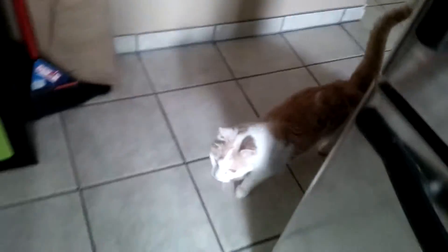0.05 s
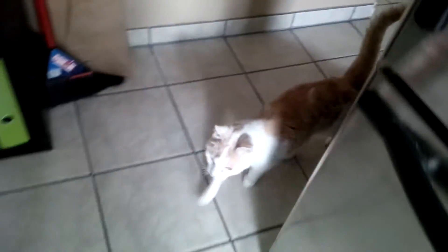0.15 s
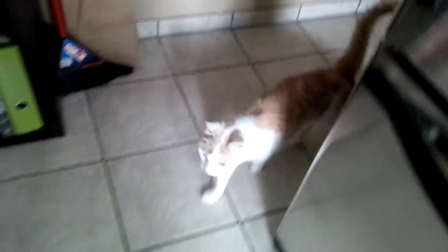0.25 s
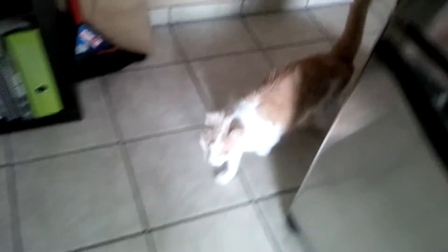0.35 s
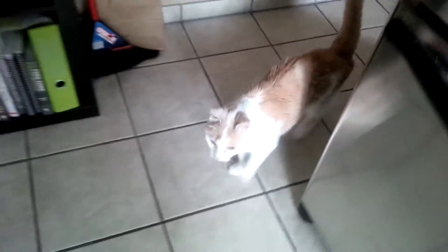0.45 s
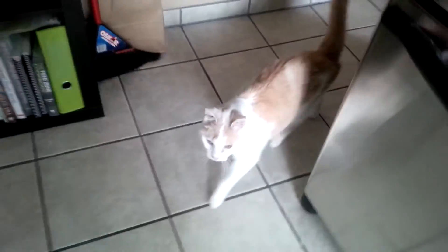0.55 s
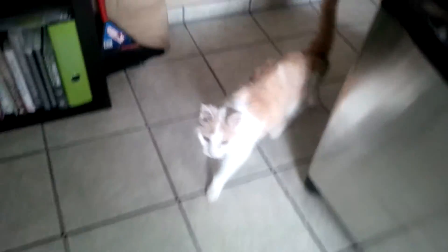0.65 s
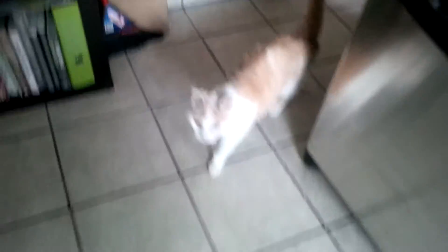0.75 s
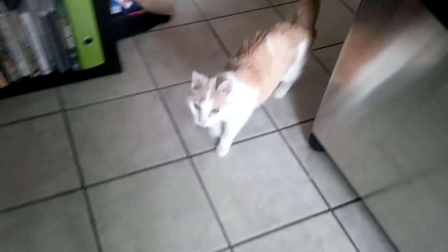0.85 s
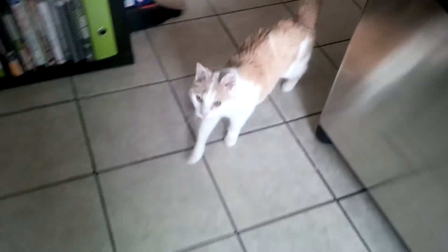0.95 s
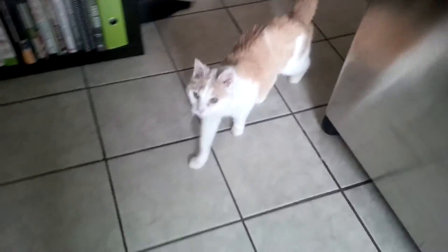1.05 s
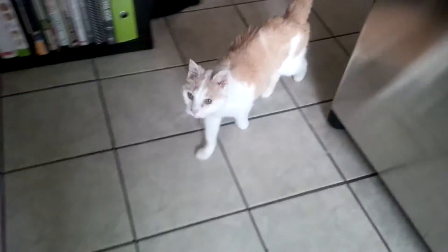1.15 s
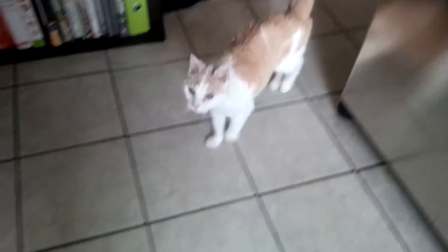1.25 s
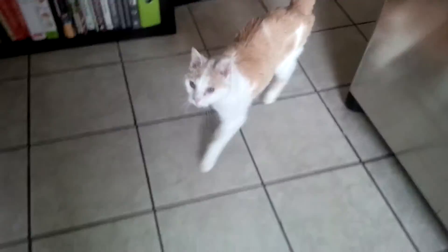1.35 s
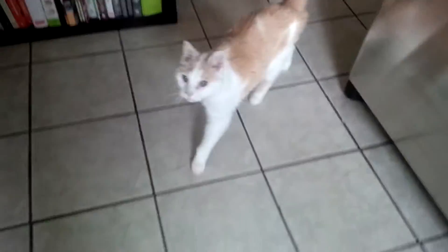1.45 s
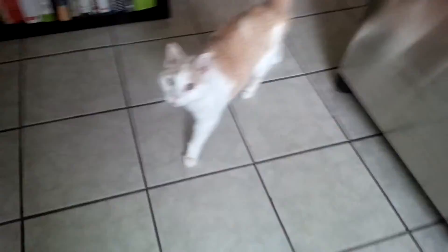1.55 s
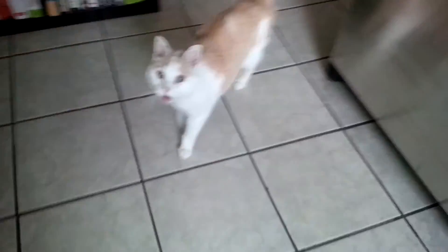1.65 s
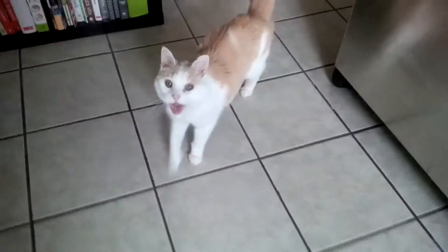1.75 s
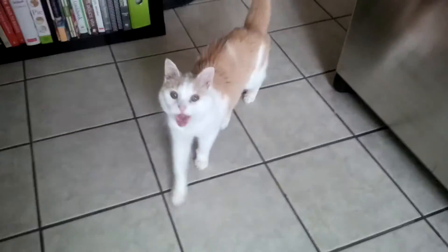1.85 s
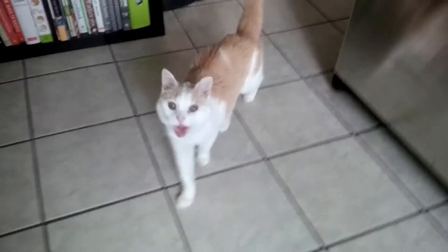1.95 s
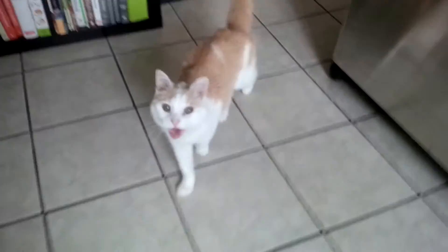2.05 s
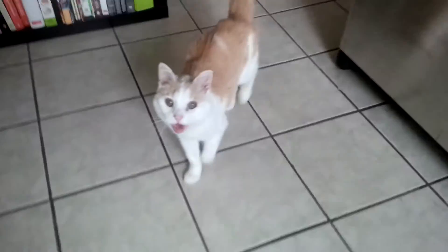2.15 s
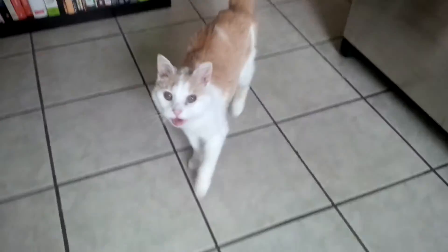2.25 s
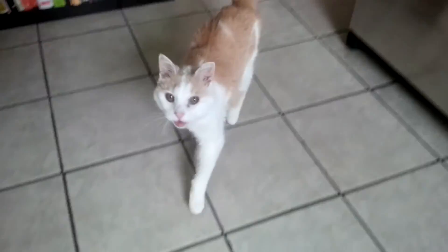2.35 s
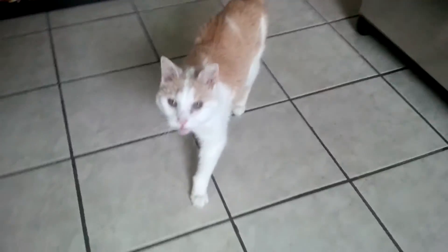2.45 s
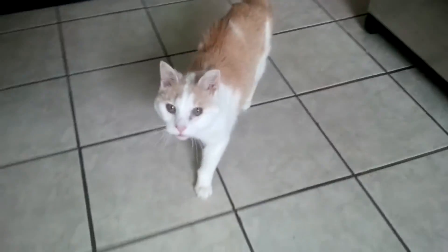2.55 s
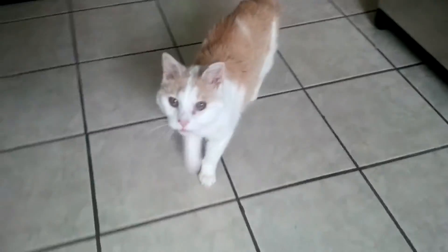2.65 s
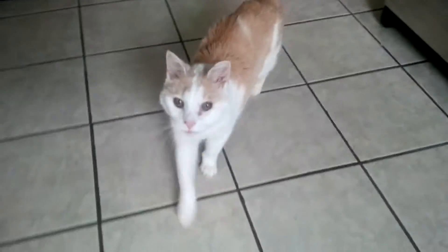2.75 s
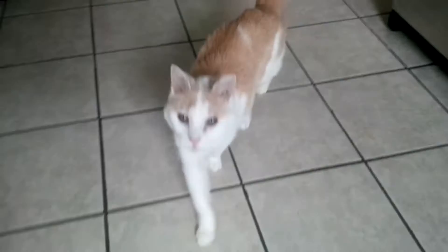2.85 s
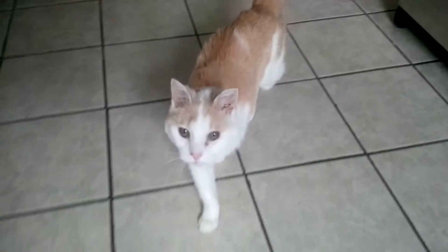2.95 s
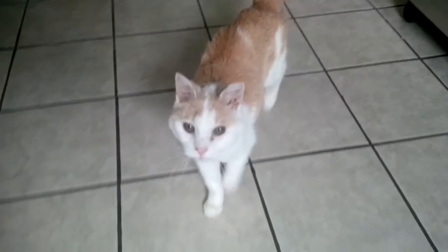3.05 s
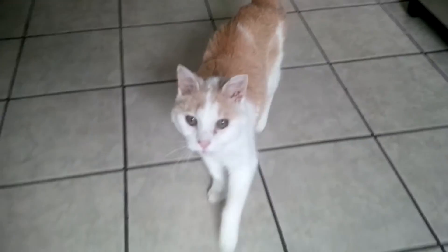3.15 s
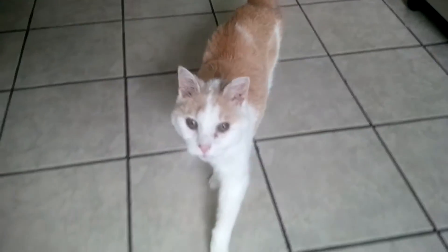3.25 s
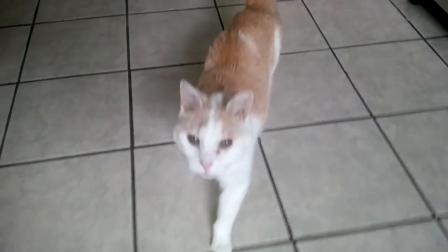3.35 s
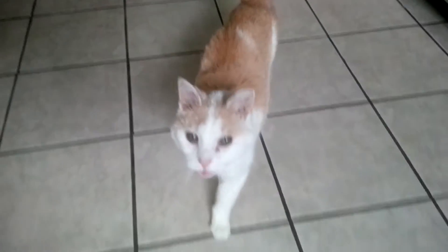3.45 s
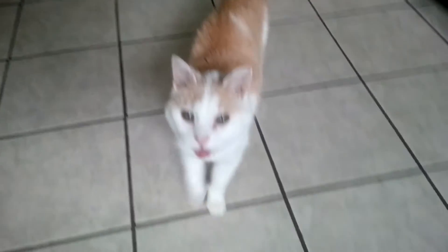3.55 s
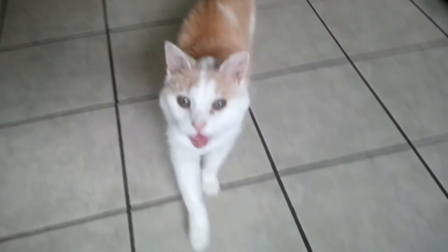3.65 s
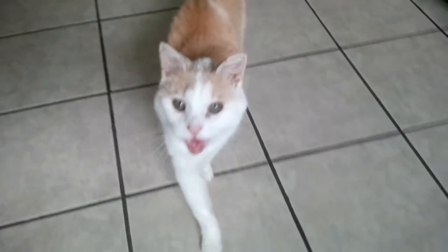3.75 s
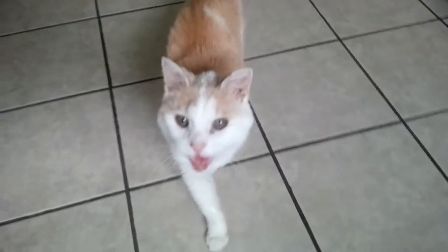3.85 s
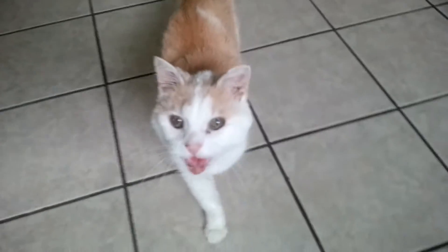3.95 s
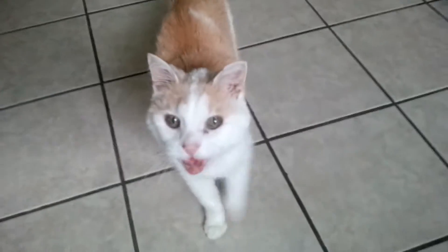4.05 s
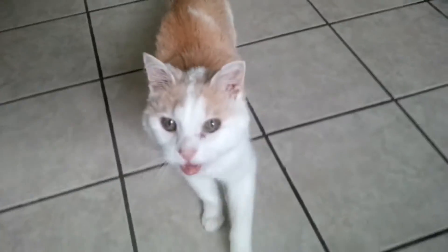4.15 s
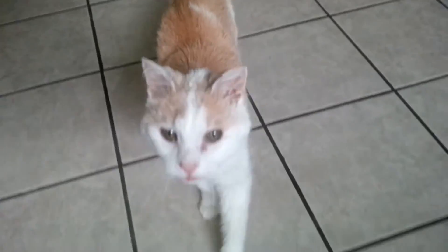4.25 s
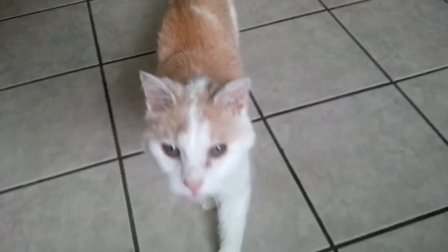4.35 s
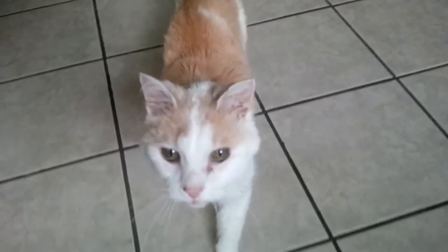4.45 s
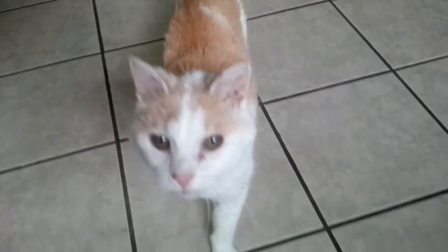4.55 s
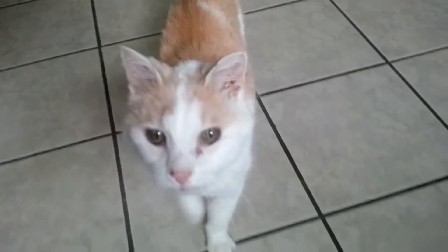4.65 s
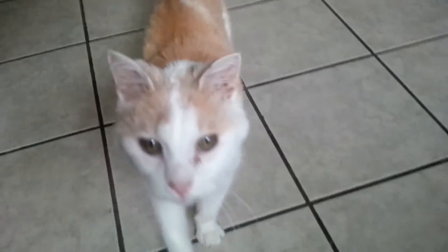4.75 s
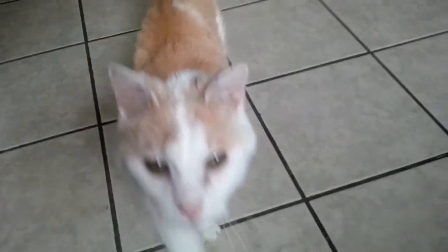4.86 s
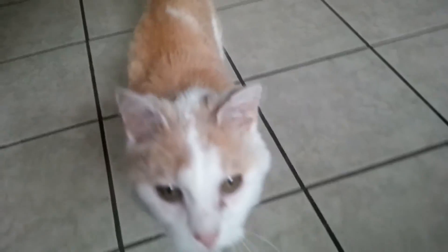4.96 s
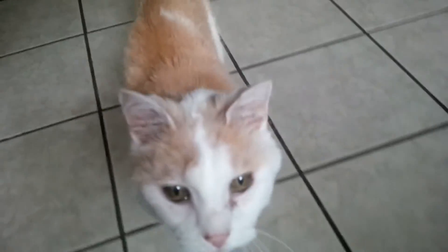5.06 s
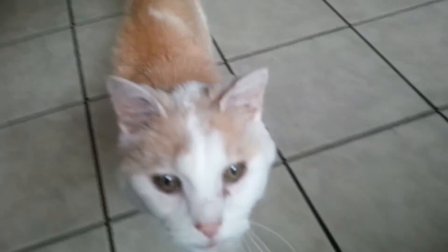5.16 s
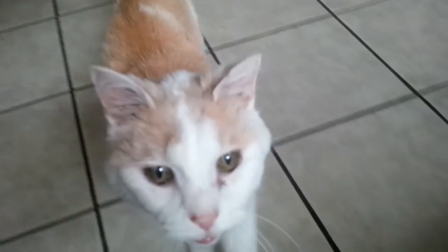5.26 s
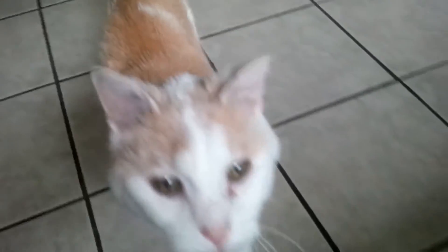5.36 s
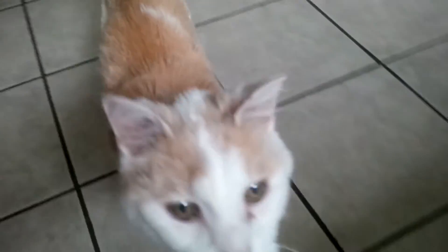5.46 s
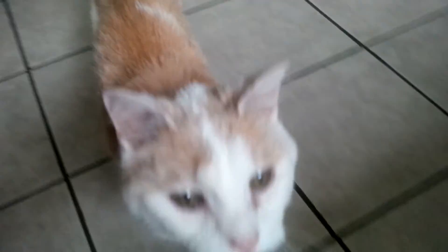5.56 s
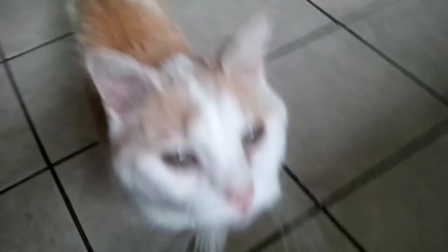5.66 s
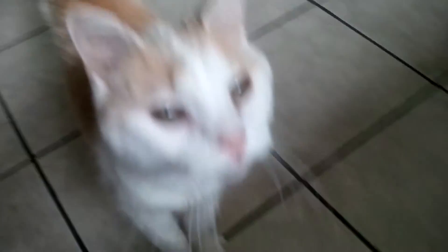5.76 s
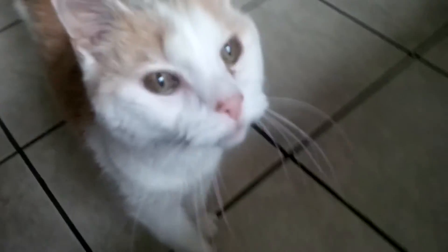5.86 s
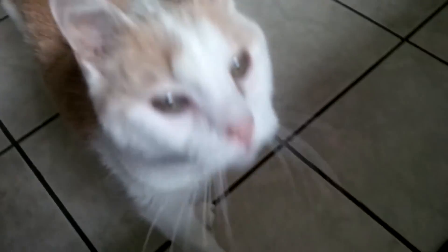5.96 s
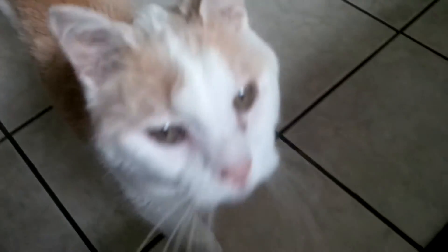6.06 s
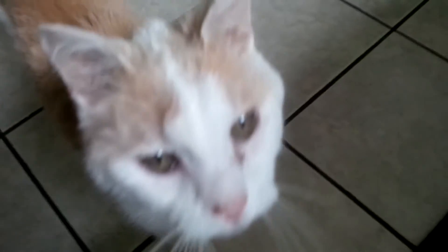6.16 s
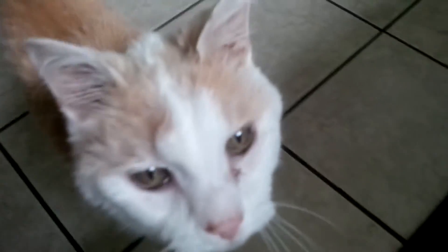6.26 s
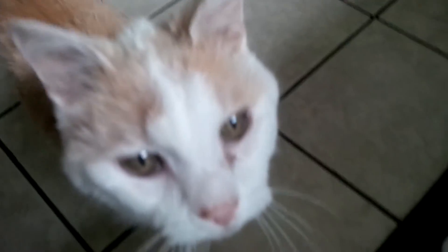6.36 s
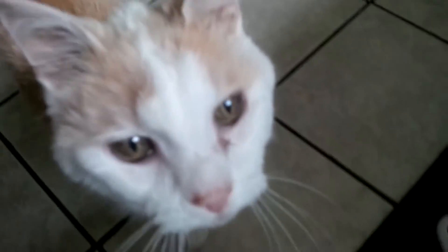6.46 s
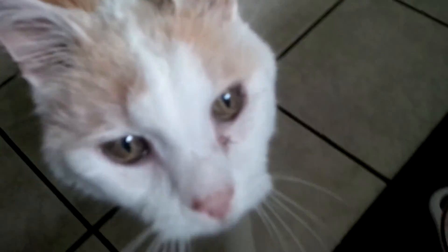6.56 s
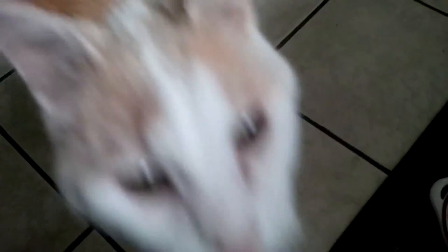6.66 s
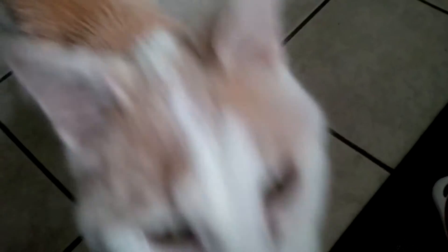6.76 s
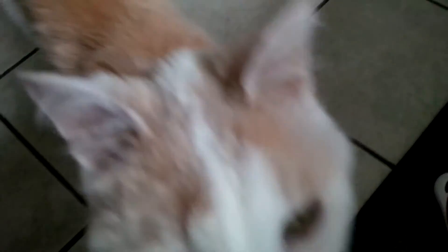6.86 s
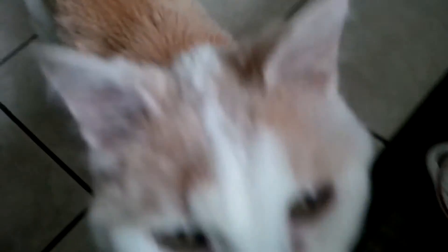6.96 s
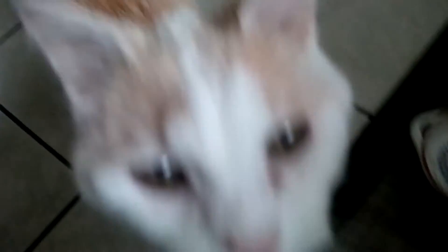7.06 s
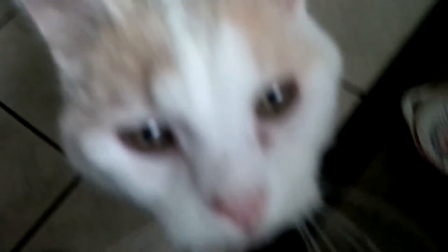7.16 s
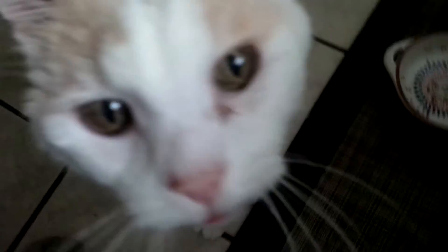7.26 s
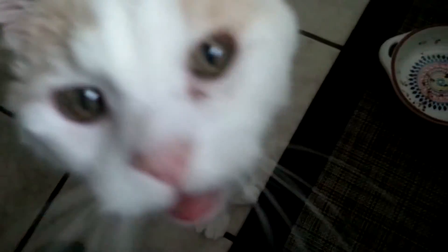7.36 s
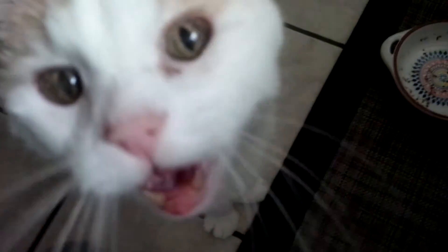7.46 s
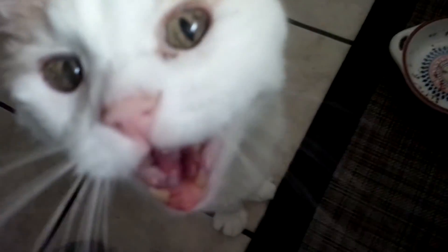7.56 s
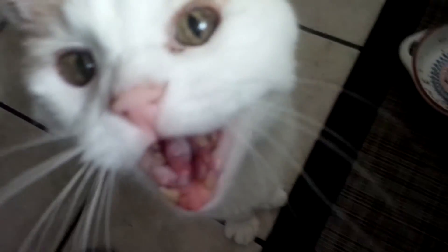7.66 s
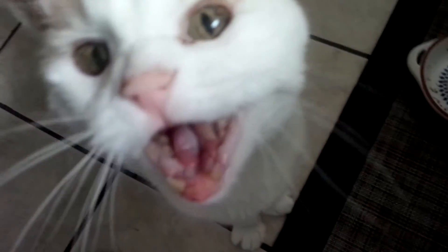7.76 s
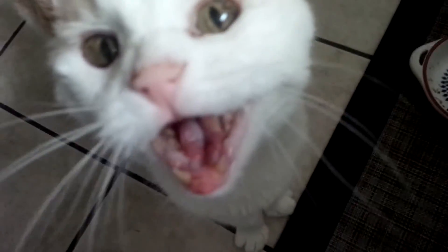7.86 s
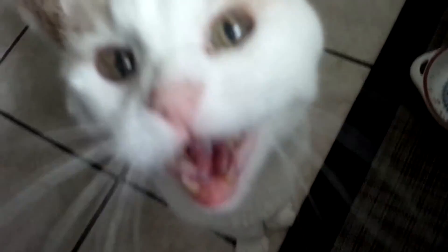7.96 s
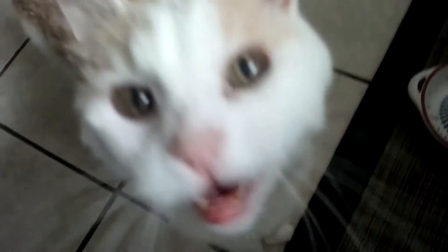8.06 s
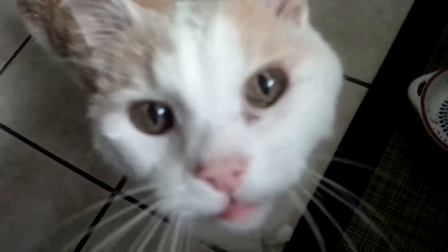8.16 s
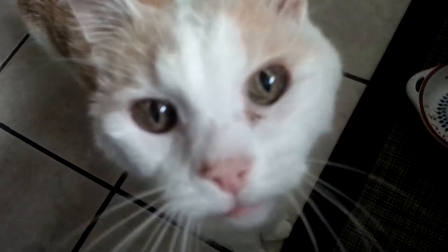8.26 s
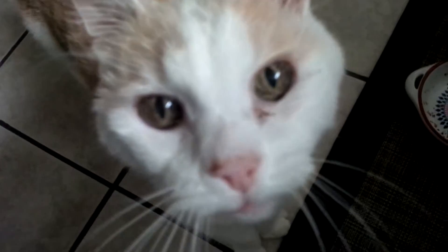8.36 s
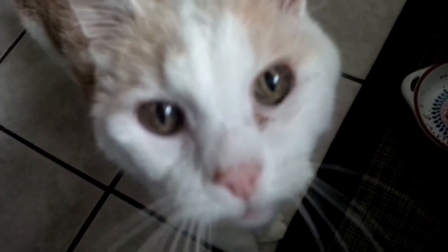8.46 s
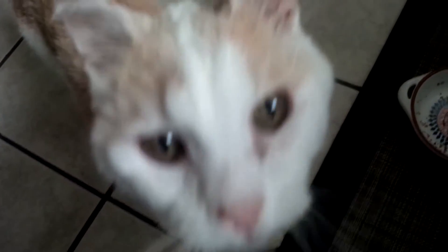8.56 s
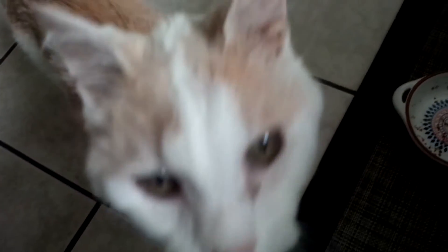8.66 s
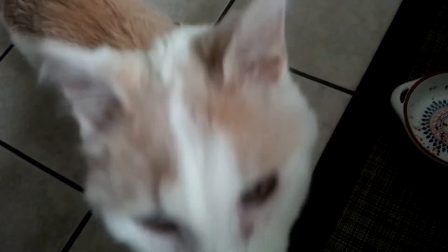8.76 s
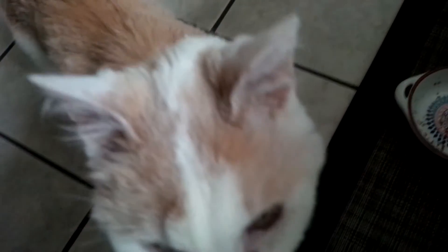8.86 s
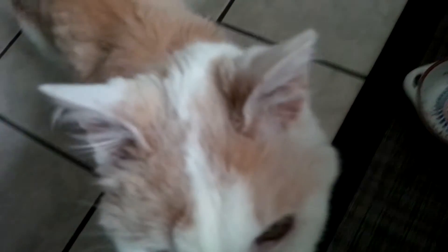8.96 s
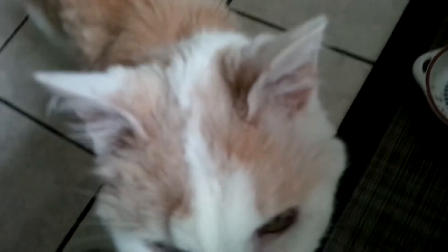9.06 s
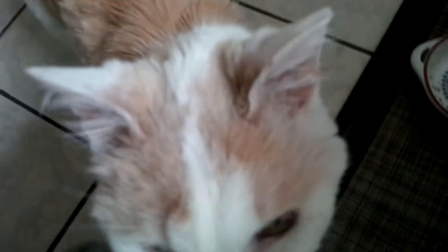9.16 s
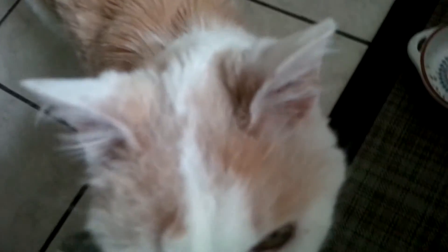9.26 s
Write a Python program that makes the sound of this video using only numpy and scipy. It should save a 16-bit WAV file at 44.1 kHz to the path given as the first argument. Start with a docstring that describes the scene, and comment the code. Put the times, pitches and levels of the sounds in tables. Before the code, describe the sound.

In a tiled room something creaks and rattles in slow slips, then an old cat gives five hoarse, purring meows, drawing closer, amid handling ticks.

```python
"""A tiled room, close on a hand-held camera with two microphone ports, the left one facing away.
First something creaks in slow slips, each crack and rattle answered by the tiles, over an uneven low rumble and room tone.
From 1.4 s an old cat meows five times: voice harmonics through a throat and an opening mouth, a purr shaking each start.
The tiles answer less over the first four calls as the cat walks up. Fingers tick on the camera body as damped pushes;
short puffs of shaped noise hiss past from 2.8 s on."""
import sys
import numpy as np
from scipy import signal
from scipy.fft import rfft, irfft, next_fast_len
from scipy.io import wavfile
from scipy.ndimage import map_coordinates

SR = 44100
rng = np.random.default_rng(int(sys.argv[2]) if len(sys.argv) > 2 else 0)


def master(y):
    """Save y as 16-bit WAV."""
    cut = np.clip(np.atleast_2d(y).T, -1, 1)
    pcm = np.round(cut * 32767)  # scale
    wavfile.write(sys.argv[1], SR, pcm.astype(np.int16))


N = 411012

# room tone colour: freq_hz, level_db (relative, per Hz)
AIR_COLOUR = [(15, -16), (30, -2.5), (60, -4.5), (100, -3.5), (150, -19), (205, -7), (260, -13),
              (350, -17.5), (800, -20.5), (1200, -23.5), (2000, -27.5), (4500, -35.5), (6500, -40.5),
              (11000, -43), (12500, -50), (13200, -70.5)]
AIR_DB = -62.5  # before the waver
# low rumble through the scene, before its lumps: time_s, level_db
RUMBLE_LEVEL = [(0, -69.5), (.65, -58.5), (2.1, -69), (3.35, -69.5), (5.11, -64), (5.76, -72.5),
                (7.11, -61), (7.4, -64.5), (9.32, -77.5)]
# rumble colour: freq_hz, level_db (relative, per Hz)
RUMBLE_COLOUR = [(15, -13), (28, 4.5), (70, -8), (140, -5.5), (230, -17.5), (400, -52.5)]
# how much the background agrees at the two ports: freq_hz, likeness (correlation)
PORT_LIKENESS = [(30, .8), (300, .75), (2000, .65), (8000, .55)]
# the left port faces away: freq_hz, left_minus_right_db
PORT_SHADE = [(60, -1), (320, -4), (740, -6), (1130, -9), (1700, -13), (2600, -9), (5000, -8), (9000, -3.5)]
# decay of the tiled room: freq_hz, t60_s
TILE_DECAY = [(150, 0.51), (1500, 0.37), (4000, 0.45), (10000, 0.028)]
TOP_HZ = 14800  # band limit of the camera

# short puffs of hiss, before their grain: height_s, rise_s, fall_s, low_band_db, high_band_db, colour_hz, colour_db
PUFFS = [(2.844, 0.052, 0.078, -57, -62, 4500, -60.5), (3.12, 0.11, 0.15, -67, -89, 2500, -76),
         (4.224, 0.027, 0.026, -49.5, -74, 5600, -55), (4.76, 0.25, 0.3, -61, -91, 1426, -68.5),
         (5.658, 0.083, 0.035, -58.5, -101, 1860, -63), (6.35, 0.022, 0.045, -75, -96.5, 1730, -75.5),
         (6.999, 0.022, 0.051, -71.5, -99, 1800, -65.5), (8.11, 0.057, 0.13, -52, -68.5, 2600, -49),
         (8.148, 0.025, 0.048, -49, -58, 11120, -57.5)]
# colour of a puff's low band: freq_hz, level_db (relative, per Hz)
PUFF_LOW_COLOUR = [(150, -13), (400, 17.5), (1500, 7), (2800, 4), (3600, -3.5), (4600, -1), (5800, -16),
                   (6500, -5.5), (9000, -49.5)]
# colour of a puff's high band: freq_hz, level_db (relative, per Hz)
PUFF_HIGH_COLOUR = [(6500, -34), (8500, 4), (10000, 0), (12500, -6), (14500, -55)]
PUFF_SPAN_DB = 30  # covered by one rise or fall
PUFF_Q, PUFF_GRAIN_DB = 2.8, 3  # sharpness of each of two stacked resonances; graininess

# fingers on the camera: start_s, thud_db (peak if the contact were instant), snap_db, contact_ms (held to 0.05-2)
TICKS = [(1.554, -32.5, -40, 0.12), (1.692, -18, -55, 0.57), (1.728, -16, -58, 1),
         (1.766, -29, -50.5, 0.42), (1.823, -24.5, -61, 0.4), (1.89, -35, -69, 0.13),
         (2.01, -36, -69, 0.21), (2.134, -23, -47, 0.26), (2.173, -32, -69.5, 0.18),
         (2.337, -23.5, -64.5, 0.28), (2.676, -29, -59, 0.41), (2.815, -8, -72.5, 0.73),
         (2.827, -10, -66.5, 0.96), (2.834, -17.5, -63, 0.8), (2.863, -30, -63, 0.5),
         (3.042, -38, -77, 0.44), (3.516, -25.5, -57, 0.048), (3.653, -35, -57, 0.34),
         (3.752, -31, -81, 0.4), (3.851, -35.5, -56, 0.1), (3.997, -34.5, -60.5, 0.079),
         (4.110, -26.5, -50.5, 0.15), (4.244, -13, -39, 1), (4.401, -29.5, -49, 0.59),
         (5.645, -37, -84.5, 0.26), (6.025, -39, -74.5, 0.36), (8.594, -36.5, -71.5, 0.046),
         (8.9, -42, -59, 0.091)]
# resonances of the camera body: freq_hz, width_hz, level_db
CAMERA_BODY = [(305, 130, 10), (805, 890, 3.5), (1600, 1100, -5)]
SNAP_T60_S = .016

# body colour of the creak: freq_hz, level_db (relative)
CREAK_COLOUR = [(40, -36), (130, -3), (290, -3.5), (500, -11.5), (650, -12), (850, -13.5), (1450, -11.5),
                (1900, -18), (2600, -24.5), (3500, -37), (4700, -46), (6000, -67), (12000, -76)]
# slow strokes of the creak: start_s, length_s, start_db, height_db, end_db, height_at (share of the length)
STROKES = [(0.027, 0.12, -39, -42.5, -56, 0.42), (.228, 0.036, -42.5, -54, -39, 0.93),
           (0.31, 0.24, -57, -35, -51, 0.93), (0.711, 0.18, -49, -37, -40.5, 0.26),
           (0.942, 0.018, -45, -46, -61, 0.45), (1.043, 0.36, -40.5, -35.5, -58.5, 0.23)]
# sharpest slips: start_s, level_db (before the slip parts), treble_db (under that, before SQUEAL_DB is added)
SHARP_SLIPS = [(0.029, -42, -32), (0.056, -39.5, -37), (0.079, -43, -37), (0.103, -42.5, -39),
               (0.138, -41, -39), (0.229, -37, -34), (0.308, -38.5, -34), (0.354, -39.5, -35),
               (0.381, -38, -43), (0.423, -37.5, -35), (0.453, -37.5, -37), (0.475, -39.5, -28),
               (0.518, -39, -34), (0.711, -40.5, -34), (0.724, -40.5, -32), (0.762, -33.5, -37),
               (0.809, -36, -40), (0.866, -34.5, -34), (0.941, -40.5, -38), (1.044, -32, -30),
               (1.1, -32.5, -35), (1.135, -32.5, -27), (1.29, -46, -36), (1.323, -47, -36)]
# squeal resonances: freq_hz, width_hz, level_db (relative)
SQUEAL_COLOUR = [(3500, 1500, -3), (4650, 630, 3)]
SQUEAL_DB = 3.5  # added to the treble of a sharp slip
RUB_DB, RUB_GROWS, SLIP_MID_DB = -32, 1.7, -42  # treble of a soft slip at the middling level; dB per dB above it
CRACK, CRACK_HISS, RATTLE = 3, .3, .3  # gains of the parts of a slip
RATTLE_T60_S = .045
SLIP_GAP_S, SLIP_UNEVEN, SLIP_SCATTER_DB = 0.012, .5, 4.5  # middling gap, its log spread, level spread

# five meows, a list each: time_s, pitch_hz, hum_db (low hum), cry_db (open cry), mouth_hz (main mouth resonance)
MEOWS = [
    [(1.42, 301, -55.5, -56, 1100), (1.5, 295.3, -46, -59, 1040), (1.62, 292.7, -35.5, -49, 1150),
     (1.665, 319.4, -46.5, -34, 1157), (1.72, 355.3, -32.5, -31, 1470), (1.84, 384.6, -40.5, -34, 1826),
     (1.95, 388.8, -45.5, -22, 1790), (2.03, 393.7, -42.5, -22, 1770), (2.14, 378.9, -29.5, -21.5, 1544),
     (2.34, 370.4, -35, -19, 1413), (2.41, 358.8, -29, -31, 1430), (2.54, 331.5, -57, -56.5, 1510)],
    [(3.25, 281, -65, -50.5, 1080), (3.3, 276.1, -49, -73, 1140), (3.4, 279.1, -39.5, -38, 1160),
     (3.53, 314.2, -31.5, -30, 1290), (3.61, 347.1, -36.5, -36.5, 1480), (3.69, 385.7, -36, -31.5, 1710),
     (3.78, 391, -41.5, -28.5, 1780), (3.88, 387.4, -36, -24.5, 1880), (3.97, 384.8, -34, -21, 1670),
     (4.09, 382.6, -40, -22, 1540), (4.15, 368.4, -27, -24.5, 1365), (4.22, 337.2, -33.5, -42.5, 1500),
     (4.27, 320, -68.5, -53, 1350)],
    [(5.05, 267.3, -56, -59, 990), (5.07, 271.4, -47, -54, 1110), (5.13, 291.1, -40.5, -50, 1120),
     (5.19, 290.6, -34, -39.5, 1280), (5.25, 302.6, -33, -31.5, 1370), (5.33, 306, -31.5, -31, 1456),
     (5.42, 318.6, -34.5, -33.5, 1490), (5.48, 305.5, -34, -39, 1470), (5.56, 288.5, -83, -67, 1470)],
    [(7.107, 289.5, -37, -50, 990), (7.125, 280.1, -47, -47.5, 995), (7.2, 263.9, -38.5, -51.5, 1180),
     (7.36, 280.4, -26.5, -33.5, 1320), (7.48, 307.8, -21.5, -23.5, 1423),
     (7.57, 317.2, -23.5, -23.5, 1504), (7.7, 356.9, -26.5, -22.5, 1644), (7.86, 366.4, -28, -17, 1710),
     (8.01, 369.8, -26.5, -20, 1683), (8.04, 361.5, -26.5, -23.5, 1600), (8.07, 332.3, -25.5, -26, 1460),
     (8.095, 291, -23.5, -26, 1390), (8.14, 278, -51.5, -66, 1320)],
    [(8.94, 328.8, -50, -48, 970), (8.97, 325.3, -51, -41, 970), (9.05, 303, -32, -47.5, 950),
     (9.1, 305.2, -26, -16.5, 960), (9.15, 305.7, -29, -39, 990), (9.2, 316, -30, -29.5, 980),
     (9.26, 342, -36, -19.5, 1205), (9.32, 335.5, -42, -17, 1165)],
]
# one row a meow: purr_rate_per_s, purr_phase_turns, lips_wide_s, purr_stops_s, voice_breaks_s, tears_s,
# chest_db (at middling effort), top_db (under the teeth), room_db
CALLS = [(33.35, 0.55, 1.69, 1.61, 2.36, 2.46, -50.5, -34, -10),
         (30.62, .1, 3.57, 3.58, 4.12, 4.2, -49, -42, -11.5),
         (33.05, 0.14, 5.44, 5.5, 5.2, 5.5, -41.5, -32, -14),
         (31.435, 0.29, 7.45, 7.6, 8.01, 8.075, -37, -19, -20),
         (31.96, 0.033, 9.23, 9.4, 12, 12, -42.5, -36, -12)]
# five lists: time_s, upper_mouth_hz, upper_db, pharynx_db, teeth_hz, teeth_db, shoulder_db (relative to the cry)
UPPER_MOUTH = [
    [(1.42, 2470, -89.5, -85, 5150, -95, -13), (1.634, 2270, -66.5, -82, 5010, -84, -6),
     (1.684, 2560, -48, -68.5, 4620, -57.5, -9), (1.862, 2440, -48.5, -49, 4840, -63, -4.5),
     (2.096, 2510, -37.5, -53.5, 4730, -50, -14.5), (2.286, 2670, -53.5, -60, 4490, -58, -11),
     (2.34, 2520, -31, -63.5, 4650, -57, -13), (2.482, 2030, -57, -81, 4500, -69.5, -4),
     (2.54, 2200, -64.5, -92, 4550, -84.5, -16.5)],
    [(3.25, 2520, -92, -100, 5070, -99, -20.5), (3.426, 2160, -71.5, -83, 4380, -83, -8.5),
     (3.448, 2100, -54.5, -87.5, 4232, -64, -25.5), (3.578, 2390, -46, -62.5, 4780, -59, -3.5),
     (3.798, 2520, -40, -46.5, 4520, -60, -1.5), (3.97, 2346, -44.5, -46, 4670, -50.5, -5.5),
     (4.098, 2460, -38, -51.5, 4310, -53.5, -5), (4.252, 2100, -49.5, -81.5, 5050, -66.5, -13.5),
     (4.27, 2350, -54.5, -71, 5120, -74, -10)],
    [(5.04, 2450, -77, -95.5, 4590, -99, -6.5), (5.06, 2540, -73.5, -85, 4670, -90.5, -8),
     (5.188, 2230, -84.5, -86, 4700, -88.5, -5), (5.248, 2020, -48, -76.5, 4610, -82, -7.5),
     (5.258, 2100, -50.5, -70, 4600, -56.5, -14), (5.306, 2150, -57, -79.5, 4650, -58, -11.5),
     (5.416, 2010, -40.5, -64.5, 4630, -57, -9), (5.512, 2100, -62, -86.5, 4870, -64, -2.5),
     (5.56, 2250, -75, -84, 4620, -90, -9)],
    [(7.1, 2420, -86, -80.5, 4650, -98.5, -4), (7.225, 2340, -79, -62.5, 4370, -80, -2.5),
     (7.328, 2270, -68, -67, 4270, -76, -7), (7.408, 2220, -43, -57, 5070, -59.5, -19),
     (7.502, 2330, -35.5, -50, 4370, -49.5, -2.5), (7.626, 2630, -36, -48.5, 5020, -46.5, -4.5),
     (7.782, 2680, -37, -44.5, 4920, -46.5, -8), (8.0, 2700, -33.5, -42.5, 4890, -43, -8),
     (8.028, 2530, -38, -51.5, 5260, -48, -7.5), (8.14, 2360, -47.5, -63, 4720, -54.5, -15)],
    [(8.94, 2580, -95.5, -99, 4800, -99, -7.5), (8.954, 2530, -82.5, -87.5, 4790, -72.5, -10.5),
     (9.034, 2230, -93.5, -92.5, 4910, -85, -6), (9.066, 2190, -85, -102, 4370, -91, -9),
     (9.102, 2130, -67, -86, 4290, -59, -22), (9.162, 2190, -59, -82, 4060, -65.5, 3),
     (9.252, 2270, -44, -58, 4430, -48, -11.5), (9.304, 2440, -48, -56, 4720, -49.5, -4.5),
     (9.32, 2440, -43, -64, 4650, -47, -21)],
]
# one row a meow: pitch_swing (share of pitch at full purr), purr_dip_db (before scaling by frequency),
# throat_hz, pharynx_hz, slit_db (palate muted by the slit)
TRACTS = [(.09, 6, 570, 3150, 22), (.08, 9, 570, 3350, 22), (.11, 9, 570, 3450, 22), (.09, 8, 690, 3500, 0),
          (.07, 11, 660, 3500, 22)]
# hoarseness while purring, one share a meow
PURR_HOARSENESS = [.28, .22, .2, .11, .07]
# the voice catches: time_s, depth_db, half_width_s
CATCHES = [(1.787, 2, 0.013), (2.101, 0.5, 0.009), (2.153, 4.5, 0.022), (2.309, 7, 0.011),
           (2.384, 9, 0.038), (4.133, 4.5, 0.005), (7.172, 18, 0.011), (7.617, 7, 0.0083),
           (9.046, 13, 0.0078)]
# throat: width_hz, rise_hz at a full gape
THROAT = (356, 117)
# pharynx: width_hz behind a slit, width_hz wide open
PHARYNX = (330, 800)
# nose while the lips are a slit: times the mouth resonance, width_hz, level_db relative to the hum or cry
NASAL = (1.47, 620, -18.5)
# vocal widths are those of a single resonance; its level response is cubed in use
CHEST_HZ, CHEST_WIDTH_HZ, TOP_VOICE_HZ, TOP_VOICE_WIDTH_HZ = 340, 260, 7900, 1400
PALATE_HZ, PALATE_WIDTH_HZ, PALATE_DB = 5900, 900, -8  # level relative to the teeth
TEETH_SLIT_HZ, TEETH_WIDE_HZ, UPPER_WIDTH_HZ = 480, 1350, 500  # widths
HUM_MID_DB, CHEST_GROWS = -40, 0.19  # middling effort; dB per dB of hum
CHEST_GAPE_DB = 4.5  # a full gape thins the chest
WIDE_S, NARROW_DB = .04, 22  # slit to wide lips; a wide mouth mutes the nose
PURR_FIRST, PURR_LAST, PURR_CLEAR, PURR_BROKEN = .95, .52, .05, .4  # purr depth 0-1
PURR_FADE_S, RASP_FADE_S, BREAK_S = .11, .24, .06  # the rasp outlasts the purr
HOARSE_CLEAR = .14  # share of the purring hoarseness
HOARSE_ONSET, HOARSE_END, HOARSE_TORN, ONSET_S, TEAR_S = .12, .25, 1.1, .08, .02
DRIFT_DB = .9  # wander of each harmonic, before its growth with harmonic number


def amp(db):
    """Decibels to gain."""
    return 10 ** (np.asarray(db) / 20)


def unit(x):
    """x at rms 1."""
    return x / np.sqrt(np.mean(np.abs(x) ** 2) + 1e-20)


def along(points, hz):
    """(Hz, value) points read on a log frequency axis."""
    f, v = np.transpose(points)
    return np.interp(np.log(hz + 1), np.log(f + 1), v)


def read(rows, t):
    """Each column after the time, at the moments t."""
    s, *cols = np.transpose(rows)
    return [np.interp(t, s, c) for c in cols]


def filtered(x, response):
    """x times a complex response of frequency."""
    m = next_fast_len(N + SR // 2)
    return irfft(rfft(x, m) * response(np.fft.rfftfreq(m, 1 / SR)), m)[..., :N]


def peak(f, hz, width):
    """One causal resonance of gain 1."""
    return 1j * f * width / (hz * hz - f * f + 1j * f * width)


def modes(table):
    """Response of several resonances of alternate sign."""
    return lambda f: sum((-1) ** k * amp(db) * peak(f, hz, w) for k, (hz, w, db) in enumerate(table))


def causal(spectrum):
    """A response with the given colour that rings only after the blow (minimum phase)."""
    def response(hz):
        cepstrum = irfft(along(spectrum, hz) * np.log(10) / 20)
        n = np.arange(len(cepstrum))
        fold = np.where(n < len(cepstrum) // 2, 2, 0) / np.where(n == 0, 2, 1)
        return np.exp(rfft(cepstrum * fold))
    return response


def noise(spectrum, alike):
    """Stereo noise of rms 1, mid and side mixed to the wanted likeness of the ports."""
    def response(hz):
        turn = np.arccos(np.clip(along(alike, hz), -1, 1)) / 2
        return amp(along(spectrum, hz)) * [np.cos(turn), np.sin(turn)]
    mid, side = filtered(rng.standard_normal((2, N)), response)
    return unit(np.array([mid + side, mid - side]))


def slow(t, rate, count):
    """count smooth random curves with rate knots a second (below 900)."""
    knots = rng.standard_normal((count, int((t[-1] - t[0]) * 900) + 9))
    return np.array([map_coordinates(k, [(t - t[0]) * rate], order=1) for k in knots])


def place(out, s, x):
    """A copy of out with x added from second s."""
    i = round(s * SR)
    x = x[..., :N - i]
    return out + np.pad(x, [(0, 0)] * (x.ndim - 1) + [(i, N - i - x.shape[-1])])


def air():
    """Room tone that wavers a little, and an uneven low rumble, both shaped noise."""
    t = np.arange(N) / SR
    lumps = amp(2.5 * slow(t, 5, count=1))
    waver = amp(1.5 * slow(t, 4, count=1) + slow(t, 14, count=1))
    tone = amp(AIR_DB) * waver * noise(AIR_COLOUR, PORT_LIKENESS)
    return tone + amp(read(RUMBLE_LEVEL, t)[0]) * lumps * noise(RUMBLE_COLOUR, PORT_LIKENESS)


def room(x):
    """The tiles' answer: every frequency dies at its own speed; the two ports hear it partly alike."""
    hz, t, z = signal.stft(rng.standard_normal((2, SR // 2)), SR, nperseg=256)
    decay = amp(-60 * t / along(TILE_DECAY, hz)[:, None])
    a, b = signal.istft(z * decay, SR, nperseg=256)[1]
    tail = np.array([a + 0.16 * b, a - 1.0 * b]) / np.linalg.norm(a)
    return signal.fftconvolve(np.pad(x, (180, 0))[None], tail, axes=1)  # delayed 180 samples, about 4 ms


def puffs():
    """Short rushes of air with a low band, a high band and a narrow colour."""
    t, out = np.arange(N) / SR, 0
    low = noise(PUFF_LOW_COLOUR, [(1000, 0.93)])
    high = noise(PUFF_HIGH_COLOUR, [(1000, 0.88)])
    white = rng.standard_normal(N)
    for s, rise, fall, low_db, high_db, hz, colour_db in PUFFS:
        colour = unit(filtered(white, lambda f: peak(f, hz, hz / PUFF_Q) ** 2))
        swell = amp(-PUFF_SPAN_DB * np.maximum((s - t) / rise, (t - s) / fall) ** 2)
        out = out + swell * (amp(low_db) * low + amp(high_db) * high + amp(colour_db) * colour)
    return out * amp(PUFF_GRAIN_DB * slow(t, 120, count=1))


def ticks():
    """A push into the camera body, brighter for a short contact, with a thin snap on top."""
    t, push, snap = np.arange(SR // 40) / SR, np.zeros(N), np.zeros(N)
    impulse = np.arange(N) == SR
    for s, db, snap_db, contact_ms in TICKS:
        u = t / np.clip(contact_ms / 1000, .00005, .002)
        force = np.exp(-u) * u
        at = round(s * SR)
        push[at:][:len(t)] -= amp(db) * force / np.sum(force)
        snap[at:][:len(t)] += amp(snap_db) * amp(-60 * t / SNAP_T60_S) * rng.standard_normal(len(t))
    body = modes(CAMERA_BODY)
    thud = filtered(push, body) / np.abs(filtered(impulse, body)).max()
    return thud + filtered(snap, lambda f: peak(f, 5200, 5600) ** 2)


def soft_slips():
    """Unevenly timed small slips crowding through each stroke, their level following its course."""
    slips = []
    for start, length, first_db, top_db, last_db, share in STROKES:
        draw = rng.standard_normal((30, 2))
        after = np.cumsum(SLIP_GAP_S * np.exp(SLIP_UNEVEN * draw[:, 0]))
        level = np.interp(after / length, [0, np.clip(share, .05, .95), 1], [first_db, top_db, last_db])
        for s, db, chance in zip(after, level, SLIP_SCATTER_DB * draw[:, 1]):
            slip_db = db + chance if s < length else -np.inf  # silent past the stroke
            slips.append((start + s, slip_db, RUB_DB + RUB_GROWS * (db - SLIP_MID_DB), 0))
    return slips


def creak():
    """Sharp slips crack and leave a grainy rattle; soft ones only rattle; heard with the room."""
    t, body, bright = np.arange(SR // 8) / SR, np.zeros(N), np.zeros(N)
    impulse = np.arange(N) == SR
    sharp_slips = [(s, db, SQUEAL_DB + treble_db, 1) for s, db, treble_db in SHARP_SLIPS]
    for s, db, squeal_db, sharp in sharp_slips + soft_slips():
        grain = amp(4 * slow(t, 600, count=1)[0])
        hiss = sharp * CRACK_HISS * amp(-60 * t / 0.0093)
        rattle = RATTLE * grain * amp(-60 * t / RATTLE_T60_S)
        slip = (hiss + rattle) * rng.standard_normal(len(t)) + sharp * CRACK * (t == 0)
        at = round(s * SR)
        body[at:][:len(t)] += amp(db) * slip
        bright[at:][:len(t)] += amp(db + squeal_db) * slip

    def sheen(hz):
        return sum(amp(db) * peak(hz, c, w) for c, w, db in SQUEAL_COLOUR) * peak(hz, 3840, 2600)

    layers = [(body, causal(CREAK_COLOUR)), (bright, sheen)]
    x = sum(filtered(v, shape) / np.linalg.norm(filtered(impulse, shape)) for v, shape in layers)
    return x + amp(-7.0) * room(x)[:, :N]


def quality(c, stop, brk, tear, rasp):
    """Purr depth and hoarseness: a purring start, a clear middle, a broken end that tears into breath."""
    purring = np.clip(1 - (c - stop) / PURR_FADE_S, 0, 1)
    depth = np.interp(c, [c[0], stop], [PURR_FIRST, PURR_LAST])
    purr = PURR_CLEAR + purring * (depth - PURR_CLEAR)
    purr = np.maximum(purr, PURR_BROKEN * np.clip((c - brk) / BREAK_S, 0, 1))
    rasping = np.clip(1 - (c - stop) / RASP_FADE_S, 0, 1)
    hoarse = rasp * (HOARSE_CLEAR + rasping * (1 - HOARSE_CLEAR))
    hoarse = hoarse + HOARSE_ONSET * np.exp(-(c - c[0]) / ONSET_S)
    broken = HOARSE_END * np.clip((c - brk) / (tear - brk + TEAR_S), 0, 1)
    torn = HOARSE_TORN * np.clip((c - tear) / TEAR_S, 0, 1)
    return purr, np.maximum(hoarse, broken + torn)


def meow(rows, uppers, rasp, swing, purr_db, throat_hz, pharynx_hz, slit_db,
         rate, turn, opens, stop, brk, tear, chest_db, top_db):
    """Harmonics of the vocal folds through the throat and the opening mouth."""
    t = np.arange(rows[0][0], rows[-1][0], 1 / SR)
    c = t[::32]  # coarse control times
    mean_hz, hum, cry, mouth_hz = read(rows, c)
    upper_hz, upper, pharynx, teeth_hz, teeth, shoulder = read(uppers, c)
    purr, hoarse = quality(c, stop, brk, tear, rasp)
    wide = np.clip((c - opens) / WIDE_S + .5, 0, 1)

    # the larynx twitches about 30 times a second: the pitch climbs, then drops fast
    twitch = 2 * np.pi * (rate * (c - c[0]) + turn + 0.058 * slow(c, 10, count=1)[0])
    slide = purr * (np.cos(twitch) + 0.19 * np.sin(2 * twitch))
    jitter = (.002 + .014 * purr) * slow(c, 90, count=1)[0]
    pitch = mean_hz * (1 + swing * slide + jitter)
    k = np.arange(1, 25)[:, None]
    f = k * pitch

    # the sound dips at the drop, its low notes a little later, its high ones deeper through open lips
    dip_scale = np.clip(f / 700, .7, 1.1 + 1.7 * wide)
    dip_delay = np.interp(f, [700, 1300], [3.3, 2])  # radians
    dip_db = -purr_db * purr * dip_scale * (.5 + np.cos(twitch - dip_delay) / 2) ** 3
    for s, db, half in CATCHES:
        dip_db = dip_db - db * np.exp(-((c - s) / half) ** 2)

    # a wider gape broadens the main resonance, a purr narrows it; a shoulder sits below it
    gape = (mouth_hz - 900) / 900
    teeth_width = TEETH_SLIT_HZ + wide * (TEETH_WIDE_HZ - TEETH_SLIT_HZ)
    pharynx_width = PHARYNX[0] + wide * (PHARYNX[1] - PHARYNX[0])
    chest = chest_db + CHEST_GROWS * (hum - HUM_MID_DB) - CHEST_GAPE_DB * (gape - .5)
    nose = np.maximum(cry, hum - 6) + NASAL[2] - NARROW_DB * wide
    in_row = [(cry, mouth_hz, (300 + 120 * gape) * (1 - 0.23 * purr)),
              (hum, throat_hz + THROAT[1] * gape, THROAT[0]),
              (upper, upper_hz * (1 + 0.072 * slide), UPPER_WIDTH_HZ),
              (teeth, teeth_hz, teeth_width),
              (pharynx, pharynx_hz, pharynx_width)]
    beside = [(cry + shoulder, .7 * mouth_hz, 480),
              (chest, CHEST_HZ, CHEST_WIDTH_HZ),
              (nose, NASAL[0] * mouth_hz, NASAL[1]),
              (teeth + PALATE_DB - slit_db * (1 - wide), PALATE_HZ, PALATE_WIDTH_HZ),
              (teeth + top_db, TOP_VOICE_HZ, TOP_VOICE_WIDTH_HZ)]
    # levels add in power; resonances in a row add their delays
    size = np.sqrt(sum(amp(2 * db) * np.abs(peak(f, hz, width)) ** 6 for db, hz, width in in_row + beside))
    lag = sum(np.angle(peak(f, hz, width)) - np.pi / 2 for db, hz, width in in_row)

    # turbulence smears each harmonic, the high ones most
    smear = hoarse * (f / 900) ** 1.2
    turbulence = slow(c, 330, count=24) + 1j * slow(c, 330, count=24)
    rough = (1 + smear * turbulence) / np.sqrt(1 + smear ** 2)
    drift = amp((DRIFT_DB + 0.22 * k) * slow(c, 8, count=24))
    edge = np.clip(np.minimum(c - c[0], c[-1] - c + .004) / .006, 0, 1)
    harmonics = -amp(dip_db) * edge * size * np.exp(1j * lag) * drift * rough
    phase = k * 2 * np.pi * np.cumsum(np.interp(t, c, pitch)) / SR
    return sum(np.interp(t, c, z.real) * np.cos(p) - np.interp(t, c, z.imag) * np.sin(p)
               for z, p in zip(harmonics, phase))


def cat():
    """Each meow, direct at both ports, with its share of the room."""
    out = np.zeros((2, N))
    for rows, uppers, rasp, tract, call in zip(MEOWS, UPPER_MOUTH, PURR_HOARSENESS, TRACTS, CALLS):
        *voice, room_db = call
        x = meow(rows, uppers, rasp, *tract, *voice)
        out = place(out, rows[0][0], np.array([x, x]))
        out = place(out, rows[0][0], amp(room_db) * room(x))
    return out


def scene():
    """Sources in front reach the left port duller and a little late; the room tone surrounds both."""
    front = cat() + creak() + puffs() + ticks()
    half = np.array([[.5], [-.5]])  # left, right
    late = half * 1.4 / SR  # 1.4 samples between the ports

    def ports(hz):
        return amp(half * along(PORT_SHADE, hz)) * np.exp(-2j * np.pi * hz * late)

    return filtered(front, ports) + air()


def record(dry):
    """The camera keeps nothing above its band limit."""
    return filtered(dry, lambda hz: hz < TOP_HZ)


dry = scene()
out = record(dry)
master(out)
```